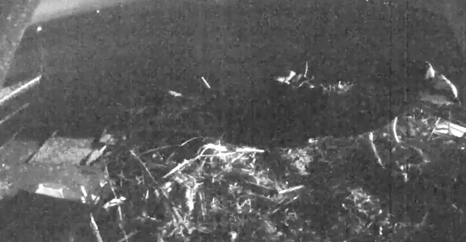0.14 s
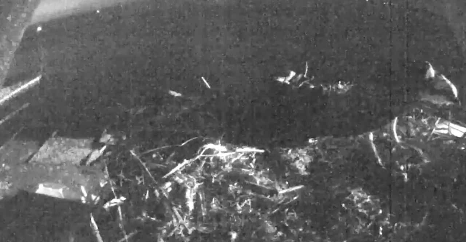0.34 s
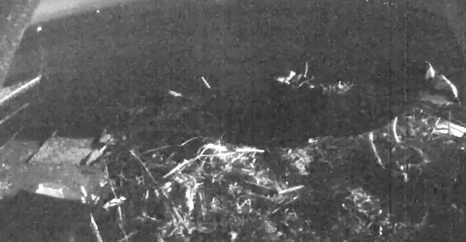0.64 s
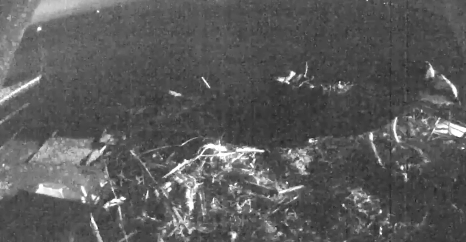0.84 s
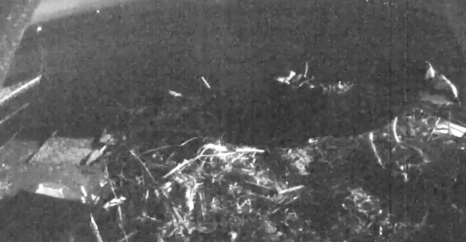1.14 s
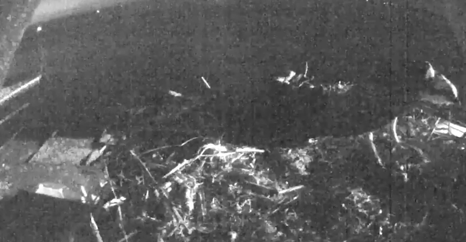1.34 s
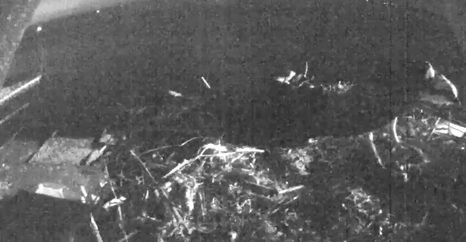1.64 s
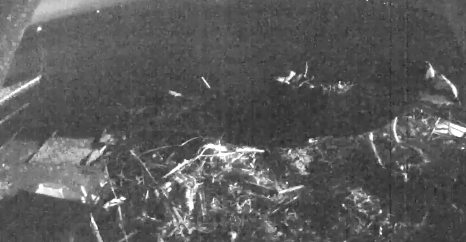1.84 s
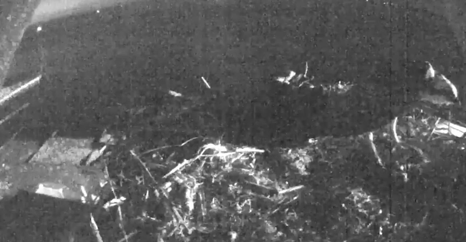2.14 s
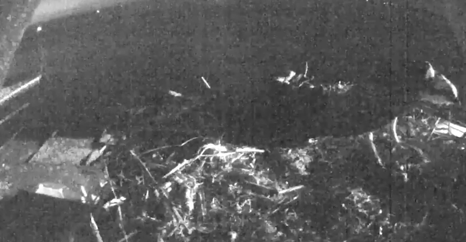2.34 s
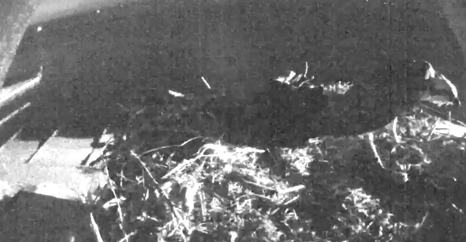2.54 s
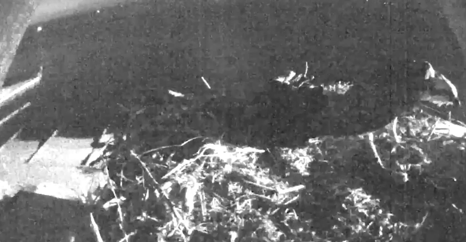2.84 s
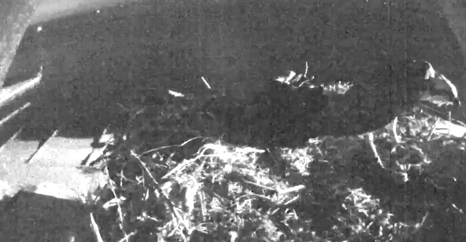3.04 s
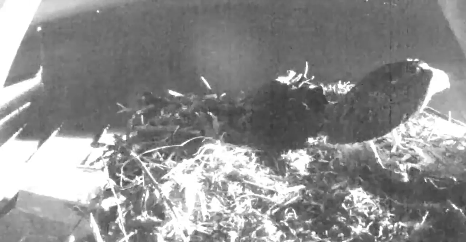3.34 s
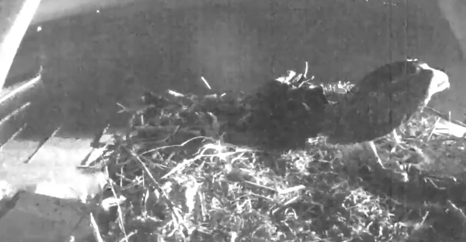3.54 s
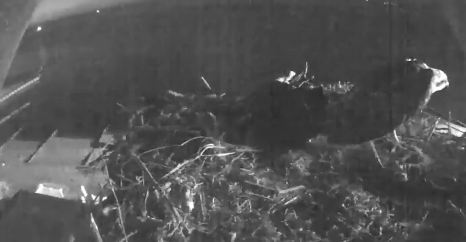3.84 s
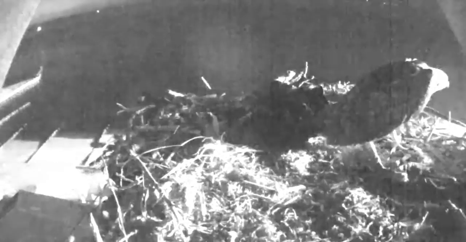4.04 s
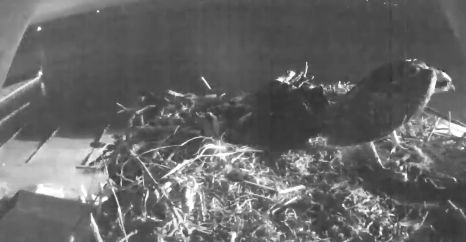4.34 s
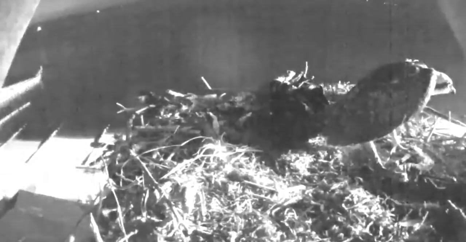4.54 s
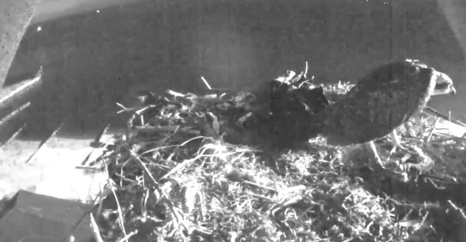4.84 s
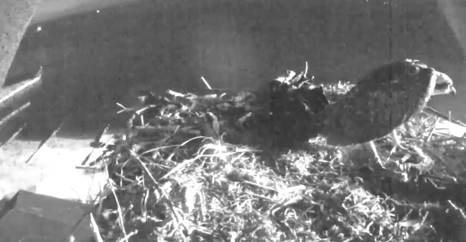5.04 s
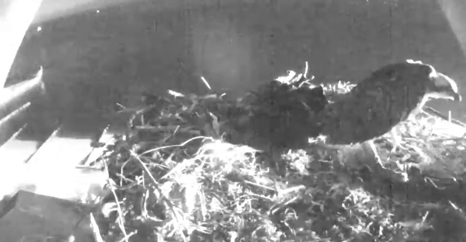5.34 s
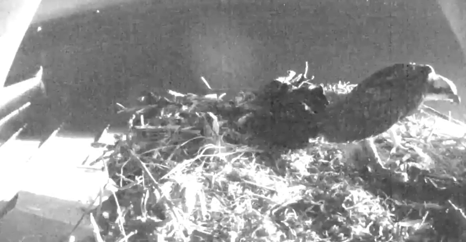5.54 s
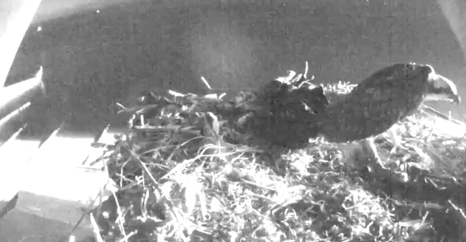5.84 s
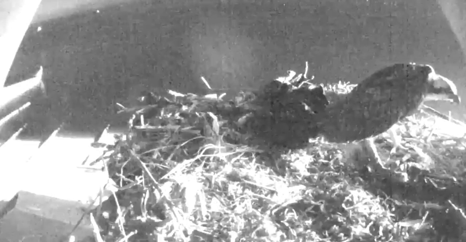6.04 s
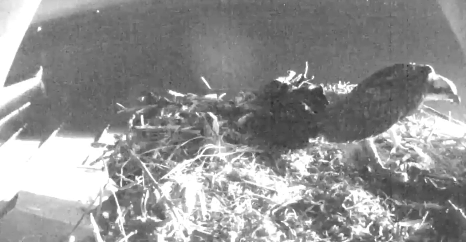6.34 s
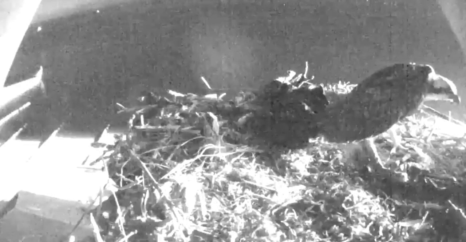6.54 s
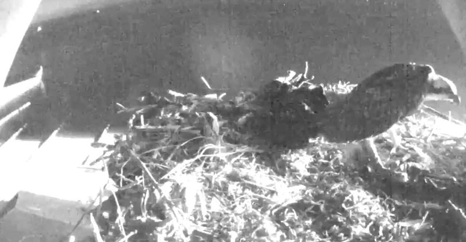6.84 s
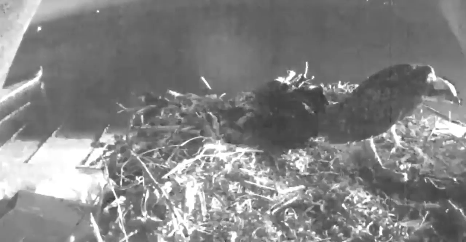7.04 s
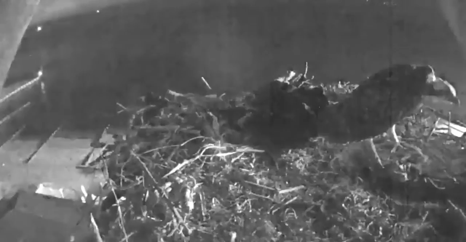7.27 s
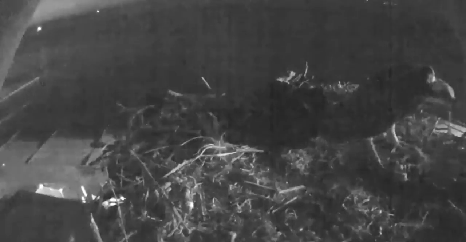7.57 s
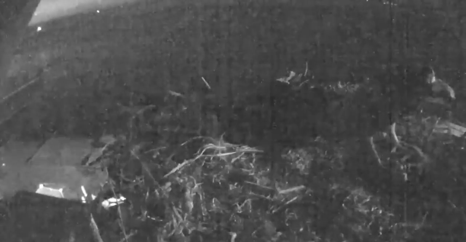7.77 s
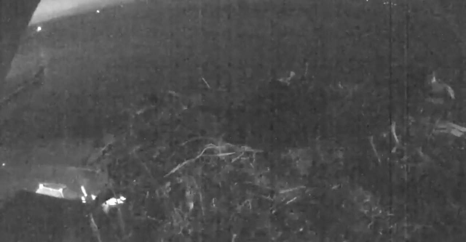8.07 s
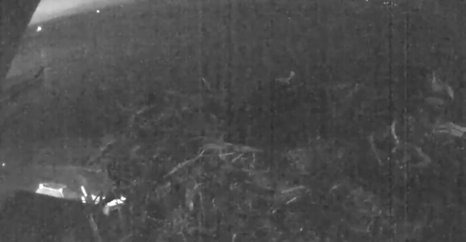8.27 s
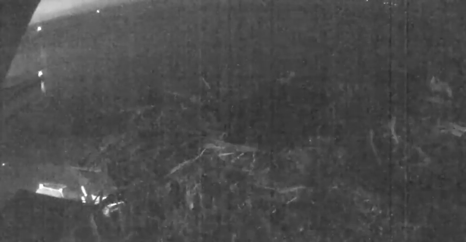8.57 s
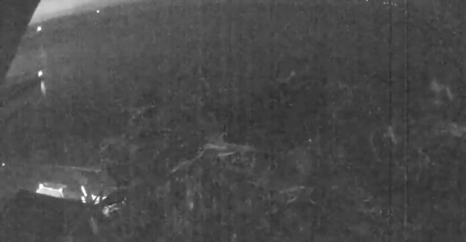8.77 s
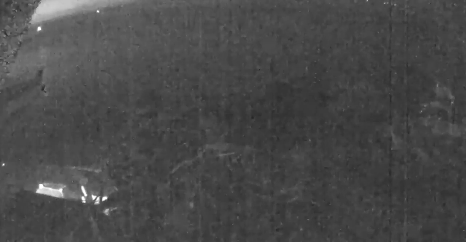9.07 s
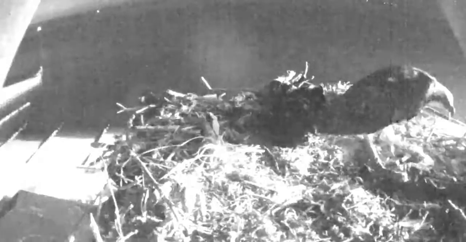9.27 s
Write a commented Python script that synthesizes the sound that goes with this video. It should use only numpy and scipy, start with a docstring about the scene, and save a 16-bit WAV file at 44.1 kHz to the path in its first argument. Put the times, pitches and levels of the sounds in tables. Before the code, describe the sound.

Irregular, overloaded firework cracks burst close by outdoors at night, each slapping off a wall and washing away over buffeting wind, with two abrupt silences.

```python
"""Fireworks burst over a town at night, heard by a small outdoor camera microphone in its housing.
Each burst is a pressure pulse and a crack of dying noise, repeated by a wall, then a long wash of reflections.
Shaped noise makes the wind buffeting the port and the town's hiss; sliding tones make a faint cricket.
The input overloads on the bursts, and the sound stream drops out twice."""
import sys
import numpy as np
from scipy import signal
from scipy.fft import rfft, irfft
from scipy.io import wavfile
from scipy.ndimage import uniform_filter1d

SR = 44100
rng = np.random.default_rng(int(sys.argv[2]) if len(sys.argv) > 2 else 0)


def inscribe(sig):
    """Save sig as 16-bit PCM at rate SR to the path in sys.argv[1].

    A 1-D sig is mono; a 2-D sig holds one channel per row.
    Samples are clipped to [-1, 1] before scaling.
    """
    pcm = np.round(np.clip(np.atleast_2d(sig).T, -1, 1) * 32767)
    wavfile.write(sys.argv[1], SR, pcm.astype(np.int16))


N = 414981  # length in samples


def amp(db):
    """Turn decibels into a gain."""
    return 10 ** (np.asarray(db) / 20)


def rms_one(x):
    """Scale to rms 1."""
    return x / np.sqrt(np.mean(x ** 2) + 1e-30)


def peak_one(x):
    """Scale each row to peak 1."""
    return x / np.abs(x).max(axis=1, keepdims=True)


def head_one(x):
    """Scale each row to rms 1 over its first 10 ms."""
    return x / np.sqrt(np.mean(x[..., :SR // 100] ** 2, axis=-1, keepdims=True))


def at_hz(points, hz):
    """Read a table between its points, on a log-frequency axis."""
    table_hz, values = np.array(points).T
    return np.interp(np.log(hz), np.log(table_hz), values)


def drift(rate_hz):
    """Slow random wandering of rms 1, made at every 40th sample and joined by straight lines."""
    r = np.exp(-np.pi * rate_hz * 40 / SR)
    noise = rng.standard_normal(N // 40 + 2002)
    slow = signal.lfilter([1], [1, -2 * r, r * r], noise)[2000:]  # skip the filter's start
    return np.interp(np.arange(N) / 40, np.arange(len(slow)), rms_one(slow))


def coloured(colour):
    """Spectrum of noise with the given colour and rms 1, silent below its first point; also its frequencies."""
    hz = np.maximum(np.arange(N // 2 + 1) * SR / N, 1)
    bins = rfft(rng.standard_normal(N)) * amp(at_hz(colour, hz)) * (hz > colour[0][0])
    return bins / np.sqrt(np.mean(irfft(bins, N) ** 2)), hz


def dying(energy, t60_s):
    """Let energy die away by 60 dB in t60_s seconds, as reflections lose it steadily."""
    return signal.lfilter([1], [1, -amp(-120 / (t60_s * SR))], energy + 1e-18)


CAVITY_HZ, CAVITY_WIDTH_HZ = 3250, 360


def housing(x):
    """The cavity in front of the microphone rings briefly, as a resonant filter."""
    r = np.exp(-np.pi * CAVITY_WIDTH_HZ / SR)
    return signal.lfilter([1, 0, -1], [1, -2 * r * np.cos(2 * np.pi * CAVITY_HZ / SR), r * r], x)


# Colour of the night air and far bursts. Each row: frequency in Hz, relative level in dB per Hz.
TOWN_COLOUR = [(120, -20), (200, -16), (322, -18.5), (430, -9), (622, -14), (771, -20), (1820, -22),
               (2060, -26.5), (3260, -16), (6490, -41.5), (7800, -52.5), (10100, -68), (17200, -120)]
TOWN_DB = -45.5


def town():
    """Steady far hiss: coloured noise whose level wanders slightly."""
    return amp(TOWN_DB + 0.24 * drift(4.2)) * irfft(coloured(TOWN_COLOUR)[0], N)


# Wind on the port, before its tops are rounded.
# Each row: time in seconds, level of slow swings in dB, level of quick slaps in dB.
WIND_LEVELS = [(0.0, -34, -41), (0.26, -27, -53), (0.57, -36, -51), (0.88, -20.5, -31.5),
               (1.06, -15.5, -28), (1.18, -46, -48), (1.47, -19, -41), (1.69, -23.5, -29.5),
               (2.24, -30, -52), (2.4, -23, -50), (2.67, -16, -32.5), (2.75, -23, -33.5),
               (2.91, -22, -81.5), (3.43, -15.5, -68), (3.556, -22.5, -45), (3.64, -6.5, -54),
               (3.67, -21, -57), (4.2, -6, -56), (4.3, -40, -41.5), (4.35, -16, -37), (4.6, -28, -40),
               (4.63, -15.5, -41), (4.67, -28, -42), (5.09, -13.5, -24), (5.95, -16.5, -38.5),
               (6.0, -12.5, -27), (6.39, -31.5, -50), (6.53, -32, -39), (6.6, -17.5, -40),
               (6.78, -25.5, -33), (7.68, -19, -27), (8.23, -23, -34.5), (8.74, -23.5, -27.5),
               (8.92, -25, -36.5), (9.03, -44, -49), (9.31, -26, -51), (9.41, -21, -42)]
# Colour of the slow swings. Each row: frequency in Hz, relative level in dB per Hz.
SWING_COLOUR = [(12, 9.5), (25, 5.5), (45, 2.5), (80, -8.5), (150, -25.5), (300, -62)]
# Colour of eddies slapping the port. Each row: frequency in Hz, relative level in dB per Hz.
SLAP_COLOUR = [(50, 2), (100, 6.5), (200, -5.5), (350, -10.5), (700, -60.5)]


def wind():
    """Lumpy turbulence on the port: slow swings and quicker slaps, rounded at their tops."""
    s, *levels = np.transpose(WIND_LEVELS)
    swing_db, slap_db = [np.interp(np.arange(N) / SR, s, level) for level in levels]
    swing_lumps = amp(2.6 * drift(19) + 2.5 * drift(8.7))
    swings = rms_one(irfft(coloured(SWING_COLOUR)[0], N) * swing_lumps)
    slaps = rms_one(irfft(coloured(SLAP_COLOUR)[0], N) * amp(5 * drift(15)))
    pressure = amp(swing_db) * swings + amp(slap_db) * slaps
    return 0.44 * np.tanh(pressure / 0.36)


# Reflections as heard through the housing. Each row: frequency in Hz, relative level in dB per Hz.
WASH_COLOUR = [(88, -21), (150, -2.5), (250, -5.5), (291, -7.5), (337, -4), (432, -3), (611, 0), (940, -3),
               (1440, -9.5), (1820, -12), (2580, -8), (3250, 3), (3800, -6.5), (4500, -11.5), (5500, -18.5),
               (6950, -27.5), (7800, -22), (10100, -76.5), (17200, -120)]
# How long far reflections last. Each row: frequency in Hz, time to fall 60 dB in seconds.
FAR_T60 = [(200, 3.25), (600, 2.56), (1500, 2.47), (2400, 2.04), (3250, 1.73), (4300, 1.31), (5500, 1.36),
           (7000, 1.3)]
# Share reflected by near walls. Each row: frequency in Hz, level in dB.
NEAR_SHARE = [(200, -12), (1000, -11.5), (3200, -10), (4200, -13.5), (7000, -9)]
# Steady stretches of wash, standing for its held end as the stream returns after a dropout.
# Each row: start in seconds, length in seconds, level in dB.
HELD = [(3.39, .07, -19), (4.149, 0.077, -22.5)]
NEAR_T60_S, FAR_DB = 0.34, -19  # decay off near walls, share from far away
WASH_LAG_S, RISE_S = .009, .007  # quiet gap before the first reflections, then their build-up time
PINGS_PER_S, PINGS_DB = 360, -18.5  # single reflections that ring the cavity
HELD_PINGS_DB = 12  # the held wash rings the cavity harder


def wash(rows):
    """Countless reflections as noise; each band builds, then dies at its own rate, grainy in time."""
    energy, held = np.zeros(N), np.zeros(N)
    energy[0] = amp(-21.5) ** 2  # earlier bursts still echo
    for s, *crack, wash_db in rows:
        energy[min(round((s + WASH_LAG_S) * SR), N - 1)] += amp(wash_db) ** 2
    for s, length, held_db in HELD:
        held[round(s * SR):round((s + length) * SR)] = amp(held_db) ** 2

    r = np.exp(-1 / (RISE_S * SR))
    near = dying(energy, NEAR_T60_S)
    bins, hz = coloured(WASH_COLOUR)
    lumps = drift(40)  # single reflections stand out across all bands
    edges = np.geomspace(150, 8000, num=19)
    out = np.zeros(N)
    for low, high in zip(edges, edges[1:]):
        band = irfft(bins * (hz >= low) * (hz < high), N)
        centre = np.sqrt(low * high)
        far = dying(energy, at_hz(FAR_T60, centre))
        power = amp(at_hz(NEAR_SHARE, centre)) ** 2 * near + amp(FAR_DB) ** 2 * far + held
        level = np.sqrt(signal.lfilter([1 - r], [1, -r], power))
        out += band * level * amp(1.66 * lumps + 0.24 * drift(8.5))

    pings = (rng.random(N) < PINGS_PER_S / SR) * rng.standard_normal(N)
    ringing = rms_one(housing(housing(pings + 1e-18)))
    ping_level = np.sqrt(near + amp(HELD_PINGS_DB) ** 2 * held)
    return out + amp(PINGS_DB) * ping_level * ringing


# Near bursts, each answered by one wall. Each row: start in seconds, pressure pulse in dB,
# peak of the cavity ring in dB, crack treble in dB, loudness fed to the wash in dB,
# echo lag in seconds, echo strength in dB.
BURSTS = [(1.0659, -12.5, -1.5, -34, -8.5, 0.032, -1), (1.498, -9.5, 5.5, -18, -8, 0.025, -3.5),
          (2.4473, -11, -6, -17.5, -8.5, .0335, -1), (2.8624, -13, -2, -32.5, -6, 0.024, 6),
          (3.6205, -5, 4.5, -35.5, -10, 0.03, -1), (4.2757, -7, -1, -21, -7.5, 0.03, -4),
          (4.788, -10, 0, -27, -8, 0.029, -2), (5.5956, -16, 2.5, -13, -7, 0.029, -3),
          (6.6127, -15, -5, -23, -10.5, .0319, -1), (6.7809, -17.5, -4.5, -37, -8, .0343, 1.5),
          (6.893, -12.5, 2.5, -19, -10, .0414, -2.5), (7.7094, -12, -3, -32, -7.5, .0335, -1),
          (9.3731, -11, 4, -26, -9.5, .032, -9)]
# Lone cracks from far bursts and stray echoes. Each row: start in seconds, pressure pulse in dB,
# peak of the cavity ring in dB, crack treble in dB, loudness fed to the wash in dB.
CRACKS = [(0.1469, -32.5, -18.5, -56, -23), (0.2262, -21.5, -12, -42, -21.5),
          (0.5919, -23.5, -37, -54, -24.5), (0.9617, -35, -52, -58, -37), (1.5592, -43, -15, -46, -14.5),
          (1.5749, -24, -9.5, -44.5, -25), (1.955, -21.5, -16, -39, -27.5), (2.0273, -35, -28, -61, -21),
          (2.283, -39, -35, -60, -36.5), (2.412, -31.5, -27, -56, -32.5),
          (2.601, -23.5, -3.5, -19.5, -19.5), (4.3008, -15.5, 1, -35, -8),
          (4.8346, -24.5, -4.5, -30, -24.5), (5.3192, -33.5, -13.5, -60, -25.5),
          (5.6274, -11, -1, -35, -13.5), (5.6535, -25, -3.5, -28, -13), (5.699, -22, -22, -34, -19.5),
          (6.0771, -32, -25, -56, -28), (6.1284, -40, -36, -60, -24), (6.137, -27.5, -43, -53, -30),
          (6.212, -45, -20.5, -64, -35), (6.6218, -16, -3, -26, -2.5), (6.659, 0, -4, -22, -13.5),
          (6.683, -41, -8, -34, -18.5), (6.709, -27, -9, -33, -9.5), (6.8006, -26, -6, -39, -19),
          (7.0675, -34, -28, -47, -17), (7.3126, -41, -21, -59, -22.5), (7.976, -29, -19, -48, -32.5),
          (7.9967, -25.5, -37, -52, -40), (8.138, -28, -34, -62, -42), (8.1537, -25.5, -5, -28, -20),
          (8.2388, -26.5, -18, -60, -32), (8.2434, -35, -20, -60, -24), (8.388, -51, -27, -65, -49),
          (8.513, -48, -34, -64, -38), (8.93, -41.5, -45, -55, -40), (9.0571, -29.5, -53, -49, -49),
          (9.2888, -23.5, -11.5, -35, -24)]
# Middle levels of very far pops.
# The row: pressure pulse, peak of the cavity ring, crack treble and loudness fed to the wash, all in dB.
FAINT = (-39.5, -36.5, -64.5, -36)
FAINT_COUNT, FAINT_SPREAD_DB = 14, 6  # the spread goes up or down by this much
ECHO_RING_DB, ECHO_TREBLE_DB = -8.5, -9.5  # what the wall gives back, on top of the echo strength
ECHO_WASH_DB = 1  # wash loudness of the echo, beside that of its burst


def arrivals():
    """Every crack that reaches the microphone: bursts, their wall echoes, lone cracks and faint far pops."""
    s, pulse_db, ring_db, treble_db, wash_db, lag, echo_db = np.transpose(BURSTS)
    echoes = [s + lag, pulse_db + echo_db, ring_db + echo_db + ECHO_RING_DB,
              treble_db + echo_db + ECHO_TREBLE_DB, wash_db + ECHO_WASH_DB]
    when, size = rng.random((FAINT_COUNT, 2)).T
    faint_db = np.array(FAINT) + FAINT_SPREAD_DB * (2 * size[:, None] - 1)
    faint = np.column_stack([when * (N - 1) / SR, faint_db])
    return np.vstack([np.array(BURSTS)[:, :5], np.transpose(echoes), CRACKS, faint])


BODY_HZ, TREBLE_HZ = (530, 2260), (4730, 9200)  # bands of the crack
CRACK_T60_S = 0.016  # time for a crack to fall 60 dB
BODY_DB, BODY_TOP_DB = -3, -15.5  # crack body beside the pressure pulse, and the most it may reach
PULL_DB, PULL_S = -8, 0.0017  # slow suction after the push: level beside the pulse, rise time


def bursts(rows):
    """A push, a longer pull and a rebound, with a crack: one click, then dying noise that rings the cavity."""
    s, pulse_db, ring_db, treble_db, wash_db = np.transpose(rows)[:, :, None]
    t = np.arange(4096) / SR
    click = 1.0 * (t == 0)
    crack = rng.standard_normal((len(rows), 4096)) * amp(-60 * t / CRACK_T60_S) + 0.93 * click
    body = signal.sosfilt(signal.butter(2, BODY_HZ, "band", fs=SR, output="sos"), crack)
    treble = signal.sosfilt(signal.butter(2, TREBLE_HZ, "band", fs=SR, output="sos"), crack)
    push = np.sin(2 * np.pi * 640 * t * (1 - t / .014)) * np.exp(-(t / .0018) ** 2)
    pull = t * np.exp(-t / PULL_S)
    slow_ring = peak_one(housing(housing(crack + 14.0 * click)))  # two passes ring up more gently
    ring = peak_one(.3 * housing(crack) + slow_ring)

    sound = amp(ring_db) * ring + amp(pulse_db) * head_one(push)
    sound += amp(np.minimum(pulse_db + BODY_DB, BODY_TOP_DB)) * head_one(body)
    sound += amp(treble_db) * head_one(treble)
    sound -= amp(pulse_db + PULL_DB) * head_one(pull)

    out = np.zeros(N + 8192)  # room for the last tail
    starts = np.round((s[:, 0] + .0012) * SR).astype(int)  # all sound 1.2 ms after their listed time
    for i, one in zip(starts, sound):
        out[i:i + 4096] += one
    return out[:N]


# Cricket chirps. Each row: start in seconds, level in dB.
CHIRPS = [(8.10, -57), (8.42, -53), (8.735, -52), (9.02, -53)]
CRICKET_HZ, STROKE_S = 4370, .044  # base pitch, time from stroke to stroke
PITCH_FALL_PER_S = 2.2  # share of the base pitch lost per second within a stroke


def cricket():
    """Four slightly rough wing strokes a chirp, each a tone sliding down a little."""
    t = np.arange(round(0.025 * SR)) / SR
    cycles = CRICKET_HZ * t * (1.035 - PITCH_FALL_PER_S / 2 * t)  # starts 3.5 % above the base pitch
    stroke = np.sin(2 * np.pi * cycles) * np.sin(np.pi * t / t[-1])
    out = np.zeros(N)
    for s, level_db in CHIRPS:
        for k, stroke_db in enumerate([-2, 0, 0, -5]):
            i = round((s + k * STROKE_S) * SR)
            out[i:i + len(t)] += amp(level_db + stroke_db) * stroke
    return out * amp(3 * drift(90))


def scene():
    """All sources add up in the air and at the port, one channel."""
    rows = arrivals()
    return (town() + wind() + wash(rows) + bursts(rows) + cricket())[None]


OVERLOAD = .53  # ceiling, as a share of full scale


def overload(x, knee):
    """Flat tops, as an input runs out of room; a low knee rounds them earlier."""
    return x / (1 + np.abs(x / OVERLOAD) ** knee) ** (1 / knee)


# Silent dropouts. Each row: start in seconds, end in seconds.
DROPOUTS = [(2.912, 3.4225), (3.679, 4.190)]


def running():
    """True while the stream plays, false in the dropouts."""
    t = np.arange(N) / SR
    return ~np.any([(t >= a) & (t < b) for a, b in DROPOUTS], axis=0)


STREAM_RATE = 16000  # samples per second
EDGE_HZ, CUTOFF_HZ = 13000, 16650
KNEE, OFFSET = 12, .018  # sharp clipping; constant shift of the input, as a share of full scale


def record(dry):
    """The converter samples slowly and clips; loud moments leave a trace of distortion treble; dropouts, top cut."""
    edge = signal.cheby2(10, 50, EDGE_HZ + 500, fs=SR, output="sos")
    x = signal.sosfilt(edge, dry) + OFFSET
    step = np.gcd(STREAM_RATE, SR)
    up, down = STREAM_RATE // step, SR // step
    slow = overload(signal.resample_poly(x, up, down, axis=1), KNEE)
    stream = signal.resample_poly(slow, down, up, axis=1, window=("kaiser", 9))[:, :N]
    stream = signal.sosfiltfilt(signal.cheby2(8, 35, 8500, fs=SR, output="sos"), stream)

    distortion = overload(x, 1.7) - x
    splash = signal.sosfilt(signal.butter(3, 13000, "high", fs=SR, output="sos"), distortion)
    splash = signal.sosfilt(signal.butter(8, 9300, "high", fs=SR, output="sos"), splash)

    gate = uniform_filter1d(running() * 1., size=6)  # six samples soften each edge
    out = (stream + amp(-15) * splash) * gate
    return signal.sosfilt(signal.cheby2(12, 70, CUTOFF_HZ, fs=SR, output="sos"), out)


dry = scene()
out = record(dry)
inscribe(out)
```